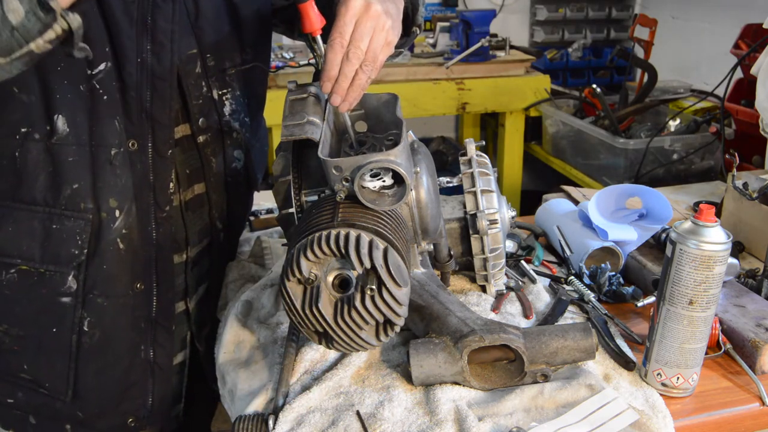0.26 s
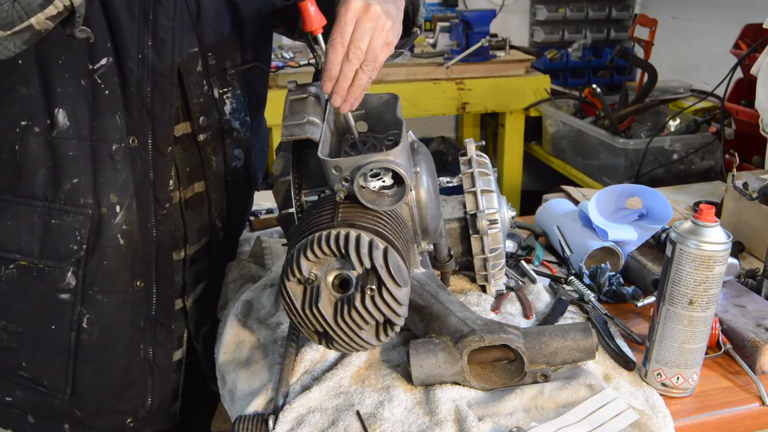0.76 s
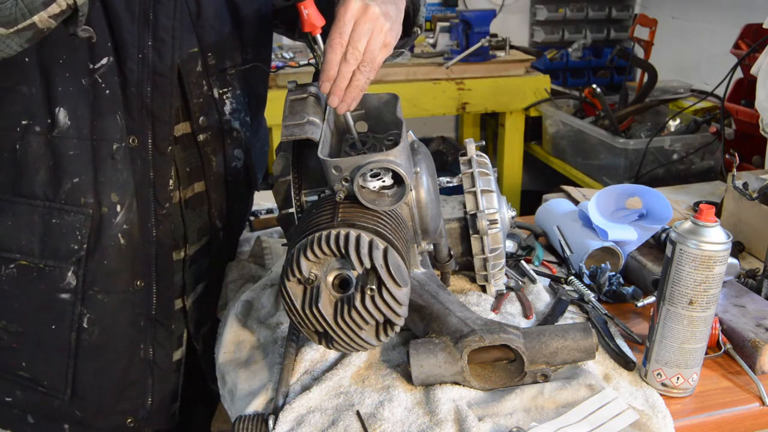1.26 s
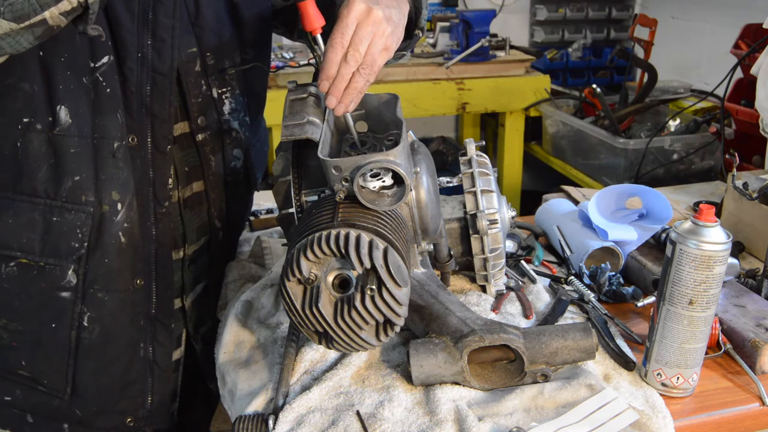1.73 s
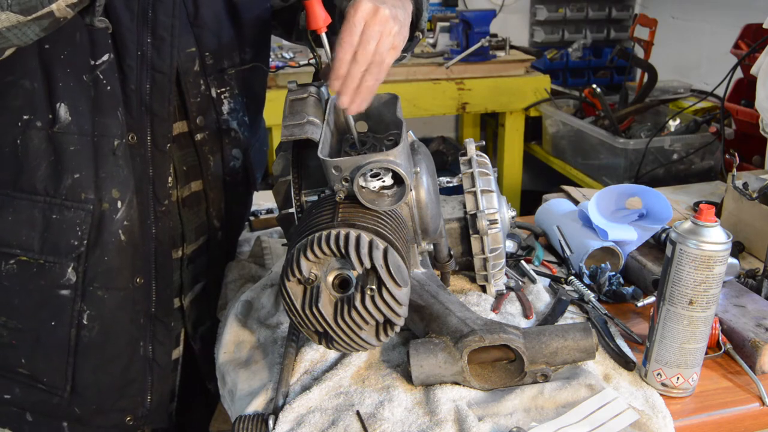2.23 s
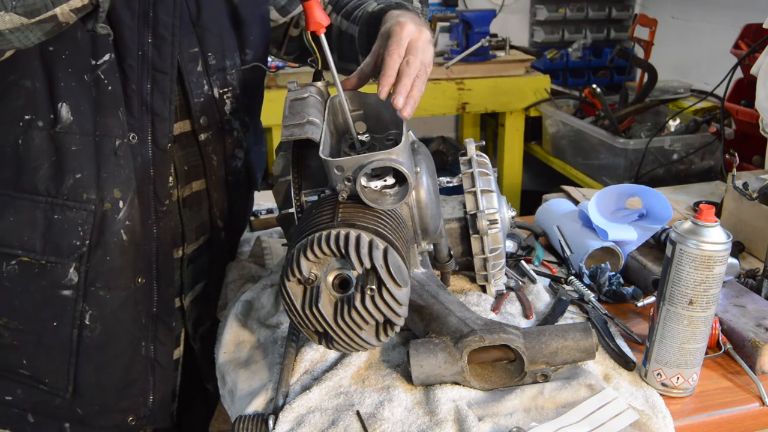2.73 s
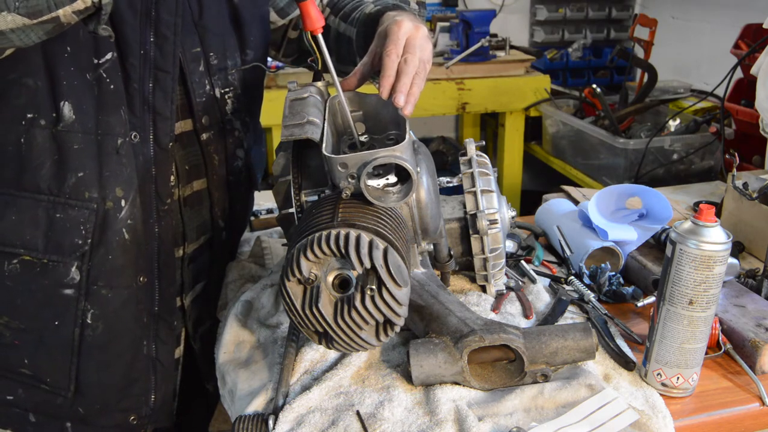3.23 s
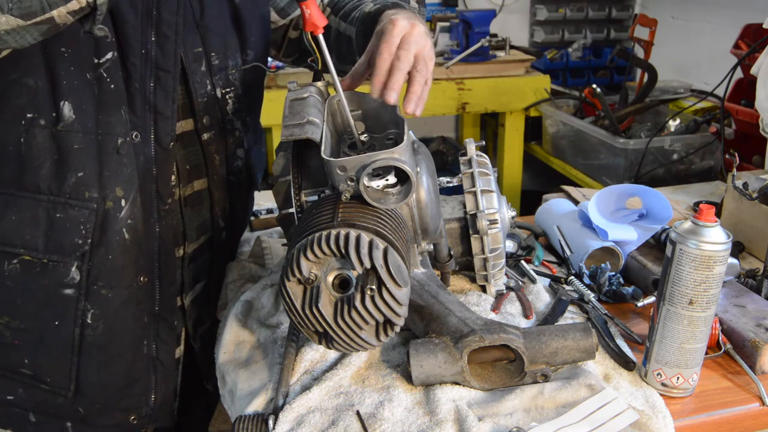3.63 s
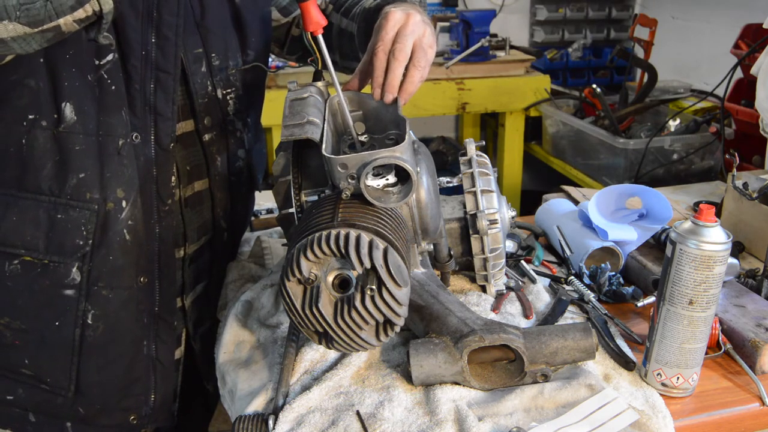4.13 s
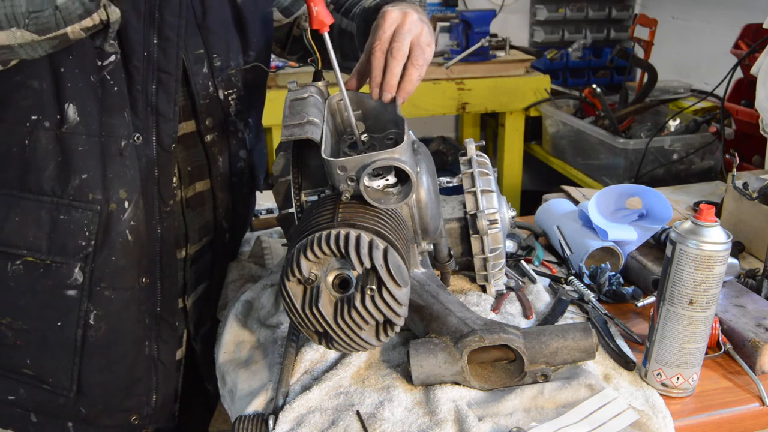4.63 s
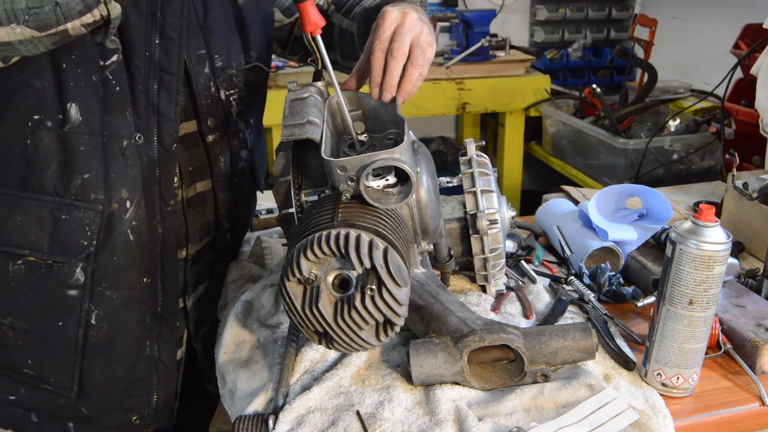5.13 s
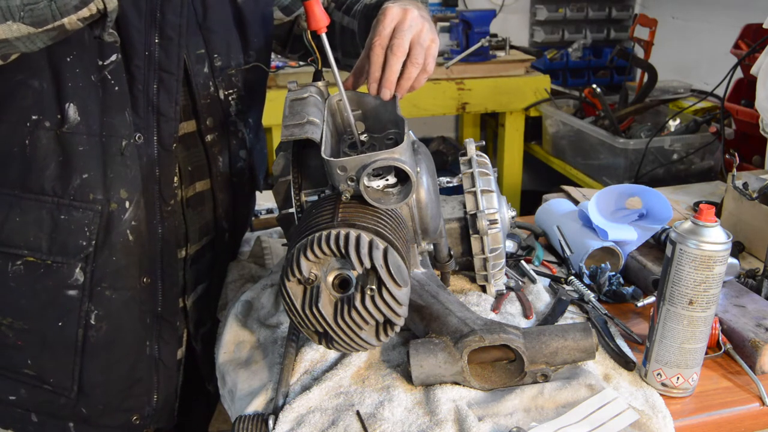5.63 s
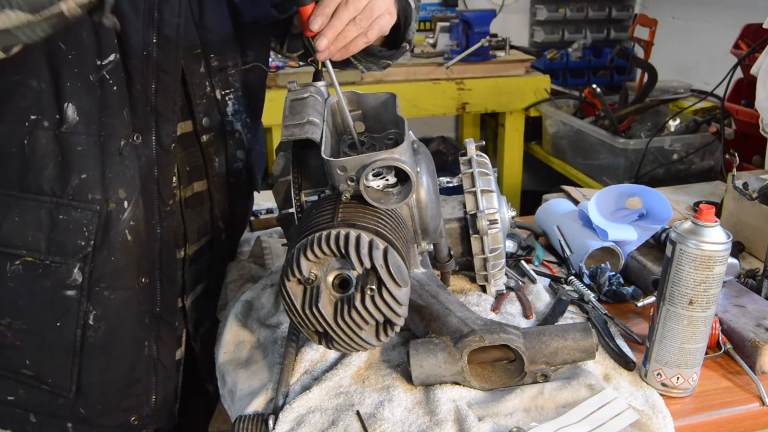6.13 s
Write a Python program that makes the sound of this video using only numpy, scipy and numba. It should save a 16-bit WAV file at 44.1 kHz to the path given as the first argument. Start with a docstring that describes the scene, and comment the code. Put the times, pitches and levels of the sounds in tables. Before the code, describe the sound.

Close up in a small workshop, a few metallic clicks and thin, faint squeaks come from a screwdriver turning a tight screw in an engine. A short lull ends with the loudest sound, a clank on the metal casing, followed by a hard clunk from the crank. Then the tip ticks and rubs lightly on the screw, with one small clink on the fins. Low hum and hiss lie underneath, the hiss swelling slightly after louder knocks.

```python
"""A small workshop, the microphone close to a small aluminium engine on a cloth-covered bench.
A screwdriver works a screw inside it: the dry thread sticks and slips into squeaks, the blade snaps in
the slot, the tip ticks on the screw. The tool knocks and rubs on the casing and clinks on the fins,
and the crank clunks against its stop. The room answers briefly, nearly mono, over mains hum and hiss;
the recorder's expander lets the hiss swell after the louder sounds."""
import sys
import numpy as np
from scipy import signal
from scipy.fft import rfft, irfft
from scipy.io import wavfile
from scipy.ndimage import uniform_filter1d
from numba import njit

SR = 44100
rng = np.random.default_rng(int(sys.argv[2]) if len(sys.argv) > 2 else 0)


def unload_wav(signal):
    """Save mono or channel-first audio to the path in sys.argv[1] as 16-bit WAV at rate SR, clipped to [-1, 1]."""
    wavfile.write(
        sys.argv[1],
        SR,
        np.round(np.clip(np.atleast_2d(signal).T, -1, 1) * 32767).astype(np.int16),
    )


N = 280917

# The aluminium casing's modes. Each row: pitch in Hz, level in dB, ring time (t60) in seconds.
CASING_MODES = [(878, -7, .24), (1001, -9, .15), (1124, -10, .24), (1283, -7, .31), (1578, -13, .3),
                (1715, -10, .2), (1946, -12, .22), (2076, -3, .26), (3495, -13, .18), (3756, -8, .15),
                (4176, -5, .18), (6800, -13, .035), (180, -19, .1), (310, -21, .08), (540, -10, .07),
                (603, -5, .1), (780, -9, .1), (1410, -3, .08), (1840, -5, .08), (2200, -3, .06),
                (2340, -3, .08), (2476, -2, .09), (2620, -6, .08), (3220, -4, .06), (3340, -2, .08),
                (4480, -11, .14), (4860, -10, .09), (5480, -16, .12)]
# Light taps on the casing. Each row: start in seconds, level in dB, centre of the excited band in Hz.
CASING_TAPS = [(2.957, -57, 1650), (3.183, -57, 2080), (4.4424, -56.5, 2300), (5.414, -43, 4970)]


def casing(clank_s=2.4926, clunk_s=3.4731):
    """The screwdriver slips and hits the casing; the crank's clunk and light taps ring it too."""
    struck_spot = pick_out(CASING_MODES, rings_hz=(1283, 2076), favour_db=6, octaves=.03)
    free_ring = (clank_s, -22, 940, 7000, .75)
    clank = strikes([free_ring], struck_spot, crack_db=-5, crack_t60=.015, wash_db=-8, wash_t60=.18)
    bite = (clank_s + .0008, -18, 1200, 4600, .052)  # the hard first contact
    thud = (clank_s + .0188, -25, 150, 1120, .41)  # the engine rocks and lands on the cloth
    jolt = (clunk_s, -45.5, 860, 2100, 1)  # from the crank, through the bearings
    taps = [(s, db, *around(hz, octaves=.51), .48) for s, db, hz in CASING_TAPS]
    blows = [bite, thud, jolt] + taps
    return clank + strikes(blows, CASING_MODES, crack_db=-6, crack_t60=.015, wash_db=-1.5, wash_t60=.15)


# Crank and flywheel, damped by a hand. Each row: pitch in Hz, level in dB, ring time in seconds.
CRANK_MODES = [(605, -14.5, 0.17), (995, -4, 0.076), (1139, 0.5, 0.16), (1203, -5, 0.1), (1725, 4.5, 0.085),
               (2160, 6, 0.034), (2330, 6, 0.03), (2770, -6, 0.017), (4010, -15.5, 0.055), (5060, -26, .03)]


def crank(clunk_s=3.4731):
    """The crank takes up its play, hits its stop hard and rings with the flywheel."""
    ring = (clunk_s, -33, 346, 5700, .71)
    stop = (clunk_s, -22.5, 1950, 2550, .22)
    return strikes([ring, stop], CRANK_MODES, crack_db=-10.5, crack_t60=.019, wash_db=0, wash_t60=.088)


# The screwdriver shaft, held in the slot. Each row: pitch in Hz, level in dB, ring time in seconds.
SHAFT_MODES = [(1049, -14, 0.14), (1359, -11, 0.14), (1765, -11, 0.038), (2313, -3, 0.021),
               (2446, -1.5, 0.06), (3285, -14.5, 0.045)]
# The blade snaps against the slot. Each row: start in seconds, level in dB, share of the ring time.
BLADE_SNAPS = [(.2458, -33, 1), (.6640, -33.5, 0.56), (0.9126, -36, 0.97)]


def shaft(low_hz=880, high_hz=4300):
    """Snaps of the blade ring the shaft; a tighter grip shortens the ring and chokes the low modes."""
    snaps = [(s, db, low_hz / share, high_hz, share) for s, db, share in BLADE_SNAPS]
    return strikes(snaps, SHAFT_MODES, crack_db=-6.5, crack_t60=.039, wash_db=-18, wash_t60=.077)


# The thin cooling fins. Each row: pitch in Hz, level in dB, ring time in seconds.
FIN_MODES = [(1578, 1, .38), (1730, -5, .18), (2078, -4, .15), (2560, -9, .04)]
# The shaft touches a fin. Each row: start in seconds, level in dB, share of the ring time.
FIN_CLINKS = [(0.2137, -42.5, 0.46), (5.386, -61.5, .8), (5.4126, -49.5, .62)]


def fins(band_hz=(1230, 2750)):
    """The cooling fins clink when the shaft brushes them."""
    clinks = [(s, db, *band_hz, share) for s, db, share in FIN_CLINKS]
    return strikes(clinks, FIN_MODES, crack_db=-1, crack_t60=.016, wash_db=-1, wash_t60=.08)


# Screw head and blade tip. Each row: pitch in Hz, level in dB, ring time in seconds.
TIP_MODES = [(1750, -5, 0.065), (2280, -6.5, 0.054), (3476, -3, 0.019), (4995, -2.5, 0.029),
             (5247, -4.5, 0.044), (5570, -6.5, 0.021), (6750, -1.5, 0.009), (6560, -4.5, 0.038),
             (7580, -3.5, 0.022), (8610, -5, .03), (8800, -7.5, .04), (9580, -6.5, 0.039),
             (10750, -9.5, 0.034)]
# Light ticks on the screw. Each row: start in seconds, level in dB, lower and upper ring in Hz.
SCREW_TICKS = [(0.911, -48, 3500, 4840), (2.9573, -55, 5300, 6600), (3.3657, -48.5, 3450, 7050),
               (3.375, -49, 2320, 3400), (3.6942, -46, 5070, 6200), (3.766, -53, 5550, 5600),
               (3.7965, -44, 5500, 8800), (4.2632, -48.5, 5000, 5060), (4.8093, -46, 4640, 6700),
               (5.3854, -45.5, 5140, 7600), (5.4108, -47.5, 9000, 10750), (5.6808, -47, 4840, 7260)]


def screw(low_hz=2000, reach_octaves=.24, share=1.05):
    """Each tick rings screw head and tip; the spot that is touched picks out two of their rings."""
    out = np.zeros(N)
    for s, db, lower_hz, upper_hz in SCREW_TICKS:
        modes = pick_out(TIP_MODES, (lower_hz, upper_hz), favour_db=9.5, octaves=.15)
        high_hz = upper_hz * 2 ** reach_octaves  # the contact excites little above this
        tick = (s, db, low_hz, high_hz, share)
        out += strikes([tick], modes, crack_db=.5, crack_t60=.0085, wash_db=-14, wash_t60=.15)
    return out


# The dry thread squeals as the screw gives. Each row: start in seconds, time under load in seconds,
# pitch in Hz, level in dB, wobble as a share of the pitch.
THREAD_SQUEALS = [(.578, 0.075, 4300, -52.5, 0.0423), (.942, 0.066, 4552, -50.5, .012)]
# Faint whistles. Each row: start and length in seconds, first and last pitch in Hz, level in dB.
THREAD_WHISTLES = [(0, 0.18, 7470, 6900, -72.5), (.24, .17, 8000, 8400, -79),
                   (.572, 0.014, 7500, 7530, -63.5), (0.701, 0.23, 4040, 3820, -77),
                   (2.388, 0.05, 6060, 6060, -64), (2.394, 0.045, 4060, 4020, -67),
                   (3.183, 0.031, 4130, 4170, -61)]


def squeaks(catch_lead_s=.03, attack_s=.017):
    """Under load the thread catches with a rising rasp, then squeals; turned lightly it whistles."""
    out, t = np.zeros(N), np.arange(SR // 2) / SR
    for s, load_s, hz, db, wobble in THREAD_SQUEALS:
        catch = glide(length_s=.07, start_hz=3120, end_hz=3920, wobble=.0535)
        add(out, s - catch_lead_s, undb(db - 10) * catch)
        envelope = np.minimum(t / attack_s, 1) * fade(np.maximum(t - load_s, 0), t60=.25)
        add(out, s, undb(db) * envelope * stick_slip(np.full(len(t), hz), wobble))
    for s, length_s, start_hz, end_hz, db in THREAD_WHISTLES:
        add(out, s, undb(db) * glide(length_s, start_hz, end_hz, wobble=.0082))
    return out


# The blade rubs over the casing. Each row: start and length in seconds, level in dB, band centre in Hz.
BLADE_RUBS = [(0.216, .035, -53.5, 1710), (3.083, 0.024, -66.5, 1350), (3.512, 0.03, -53, 1090),
              (3.737, 0.048, -64.5, 1520), (4.286, 0.05, -66, 1550), (4.817, 0.058, -60, 1220),
              (5.103, .026, -70, 2100), (5.4, 0.042, -54, 1750), (6.324, .051, -70, 1440)]


def rubs(grit_db=5):
    """A swell of tiny uneven catches drives the casing, which the pressing blade damps."""
    out = np.zeros(N)
    damped_ring = ringing(CASING_MODES, np.arange(SR // 4) / SR, share=.36)
    strokes = [(s, length_s, db, *around(hz, octaves=.4)) for s, length_s, db, hz in BLADE_RUBS]
    grind = (3.7, .85, -76, 1440, 6000)  # the tip in the slot, while the crank is turned by hand
    for s, length_s, db, low_hz, high_hz in strokes + [grind]:
        n = int(length_s * SR)
        swell = np.sqrt(np.hanning(n))
        grit = rng.standard_normal(n) * undb(grit_db * walk(900, n)) * swell
        rub = band(signal.fftconvolve(grit, damped_ring), low_hz, high_hz, order=8)
        add(out, s, undb(db) * rub * np.sqrt(n / np.sum(rub ** 2)))
    return out


def strikes(blows, modes, crack_db, crack_t60, wash_db, wash_t60):
    """Each blow rings the modes; the contact sets the band, the grip the share of the ring time."""
    out, t = np.zeros(N), np.arange(SR // 2) / SR
    # while the parts still touch, most of the energy drains at once: a crack with the same pitches
    crack = undb(crack_db) * ringing([(hz, db, crack_t60) for hz, db, _ in modes], t, share=.85)
    for s, db, low_hz, high_hz, share in blows:
        wash = undb(wash_db) * cluster(modes, len(t)) * fade(t, wash_t60 * share)
        blow = ringing(modes, t, share) + crack + wash
        add(out, s, undb(db) * band(blow, low_hz, high_hz, order=6))
    return out


def ringing(modes, t, share):
    """Struck metal rings as decaying sines of alternating sign; share scales their ring times."""
    return sum((-1) ** k * undb(db) * np.sin(2 * np.pi * hz * t) * fade(t, t60 * share)
               for k, (hz, db, t60) in enumerate(sorted(modes)))


def cluster(modes, n, width_hz=110, spread=.022):
    """Noise gathered round each mode: the countless weak resonances that flank the strong ones."""
    f = np.fft.rfftfreq(n, 1 / SR)
    power = sum(undb(db) ** 2 * np.exp(-((f - hz) / (width_hz + spread * hz)) ** 2)
                for hz, db, _ in modes)
    return unit(irfft(rfft(rng.standard_normal(n)) * np.sqrt(power), n))


def pick_out(modes, rings_hz, favour_db, octaves):
    """A contact drives the modes near the given rings fully and the others more weakly."""
    def nearness(hz):
        return max(np.exp(-(np.log2(hz / ring) / octaves) ** 2) for ring in rings_hz)
    return [(hz, db - favour_db * (1 - nearness(hz)), t60) for hz, db, t60 in modes]


def stick_slip(hz, wobble, wobble_rate=520, flutter_rate=300, flutter_db=3, spots=3):
    """A few spots of the thread sing at one pitch, shake with the friction and beat into a rasp."""
    n, tone = len(hz), 0
    for _ in range(spots):
        shaken_hz = hz * (1 + wobble * walk(wobble_rate, n))
        cycles = np.cumsum(shaken_hz) / SR + rng.random()
        flutter = undb(flutter_db * walk(flutter_rate, n))
        tone = tone + np.sin(2 * np.pi * cycles) * flutter
    return unit(tone)


def glide(length_s, start_hz, end_hz, wobble):
    """A short stick-slip tone that swells, slides in pitch and fades."""
    n = int(length_s * SR)
    tone = stick_slip(np.linspace(start_hz, end_hz, n), wobble)
    return unit(tone * signal.windows.tukey(n, .5))


def workshop(direct, side_db=-27):
    """Bench clutter, a short tail and the far wall's smeared echo follow the sound to the microphone."""
    t = np.arange(SR // 2) / SR
    bench, tail, far_wall = (.002, -9, .089), (.012, -14, .27), (.044, -15, .094)
    response = 0
    for delay_s, db, t60 in bench, tail, far_wall:
        burst = rng.standard_normal((2, len(t))) * (t > delay_s) * fade(np.abs(t - delay_s), t60)
        response = response + undb(db) * burst / np.linalg.norm(burst[0])
    mid, side = (signal.fftconvolve(direct, band(r, 220, 4900, order=1))[:N] for r in response)
    return direct + mid + undb(side_db) * np.array([side, -side])


# Room air and microphone hiss. Each row: frequency in Hz, relative spectral level in dB.
AIR_SPECTRUM = [(25, -28), (45, -11.5), (75, -11), (100, -6.5), (130, -5), (178, -.5), (390, -3), (740, -4),
                (1100, -7), (2000, -12), (4000, -14), (8000, -18), (12000, -22), (15500, -26.5)]
# Their stereo width at the microphone. Each row: frequency in Hz, side minus mid in dB.
AIR_WIDTH = [(60, -28), (250, -16), (1300, -23), (2500, -16), (6000, -18), (10000, -8.5), (14000, -11)]
# Mains hum in the room. Each row: pitch in Hz, level in dB.
MAINS_HUM = [(60, -85), (120, -78), (178, -84)]


def background(air_db=-64):
    """Room air and microphone hiss over a slightly wavering mains hum."""
    t = np.arange(N) / SR
    mid, side = (undb(air_db) * unit(colour(rng.standard_normal(N), AIR_SPECTRUM)) for _ in range(2))
    side = colour(side, AIR_WIDTH)
    waver = undb(walk(9, N))
    hum = waver * sum(undb(db) * np.sqrt(2) * np.sin(2 * np.pi * hz * t) for hz, db in MAINS_HUM)
    return mid + hum + np.array([side, -side])


def undb(db):
    """Decibels to gain."""
    return 10 ** (np.asarray(db) / 20)


def unit(x):
    """Scale to rms 1."""
    return x / np.sqrt(np.mean(x ** 2))


def fade(t, t60):
    """Decay by 60 dB in t60 seconds."""
    return undb(-60 * t / t60)


def add(track, s, x):
    """Mix x into the track from second s on."""
    i = max(int(s * SR), 0)
    track[i:i + len(x)] += x[:N - i]


def around(hz, octaves):
    """Edges of a band centred on hz."""
    return hz * 2 ** (-octaves / 2), hz * 2 ** (octaves / 2)


def band(x, low_hz, high_hz, order=3):
    """Causal high-pass and low-pass."""
    for hz, kind in (low_hz, "high"), (high_hz, "low"):
        x = signal.sosfilt(signal.butter(order, min(hz, SR / 2 - 1), kind, fs=SR, output="sos"), x)
    return x


def colour(x, points):
    """Shape a sound by (Hz, dB) points."""
    hz, db = np.transpose(sorted(points))[:2]
    f = np.maximum(np.fft.rfftfreq(len(x), 1 / SR), 1)
    gain = undb(np.interp(np.log(f), np.log(hz), db))
    return irfft(rfft(x) * gain, len(x))


def walk(rate, n):
    """A smooth random drift of rms 1, changing rate times a second."""
    hold = max(int(SR / rate), 1)
    steps = np.repeat(rng.standard_normal(n // hold + 1), hold)
    return unit(uniform_filter1d(steps, hold)[:n])


def scene():
    """Engine and screwdriver as the microphone hears them in the workshop, over air and hum."""
    direct = casing() + fins() + crank() + shaft() + screw() + rubs() + squeaks()
    return workshop(direct) + background()


@njit
def follow(drive, attack_s, release_s):
    """The expander's opening, 0 to 1: charged by the drive, leaking away slowly."""
    out, opening = np.empty(len(drive)), .4
    for i in range(len(drive)):
        opening += (drive[i] * (1 - opening) / attack_s - opening / release_s) / SR
        out[i] = opening
    return out


def expander(x, threshold_db=-56, attack_s=.065, release_s=.8, closed_db=-7, range_db=10):
    """Turns quiet stretches down; treble in the left channel opens it, and it closes slowly."""
    treble = band(x[0], 1580, 9800)
    relative_power = uniform_filter1d(treble ** 2, size=441) / undb(threshold_db) ** 2
    drive = relative_power ** 2 / (1 + relative_power ** 2)
    return x * undb(closed_db + range_db * follow(drive, attack_s, release_s))


def record(dry):
    """The recorder's expander, then its steep treble cut-off."""
    top_hz = 15750
    low_pass = signal.ellip(10, .1, 70, top_hz, fs=SR, output="sos")
    return signal.sosfilt(low_pass, expander(dry))


dry = scene()
out = record(dry)
unload_wav(out)
```